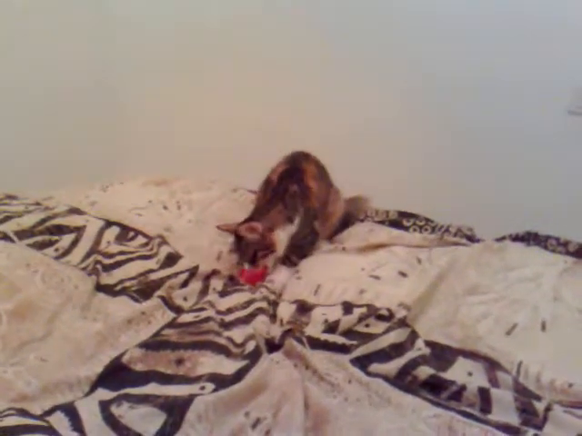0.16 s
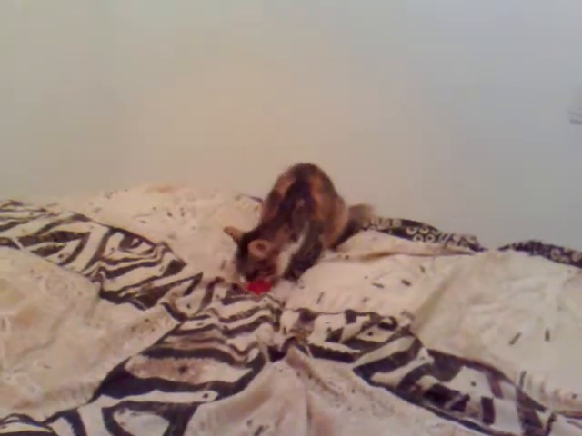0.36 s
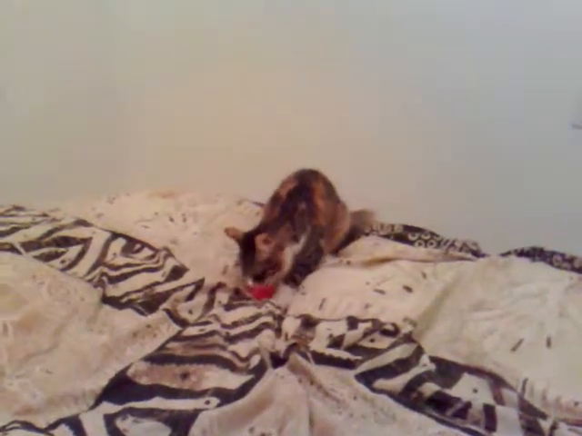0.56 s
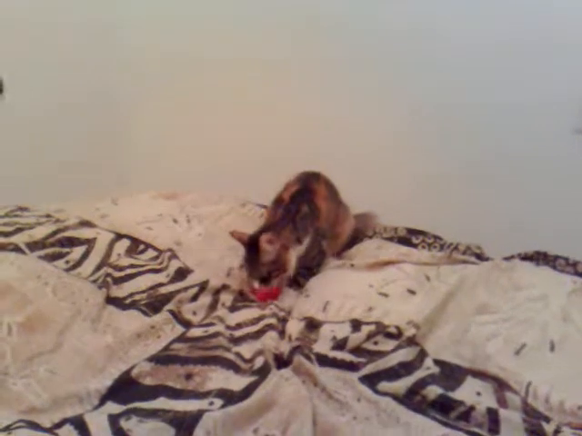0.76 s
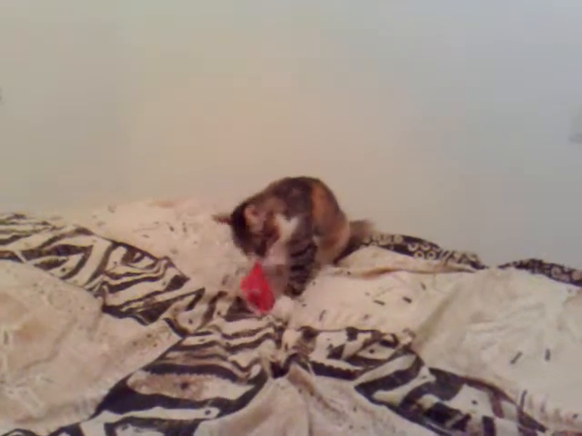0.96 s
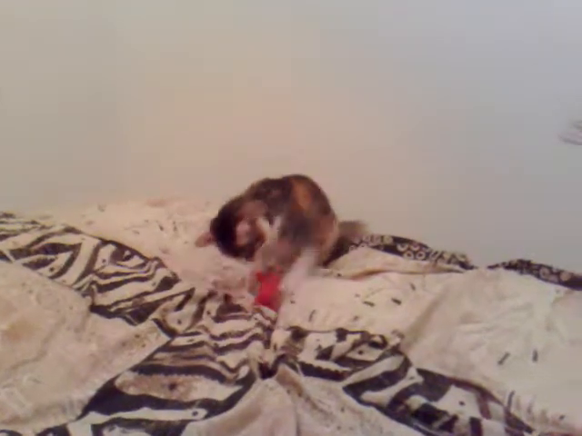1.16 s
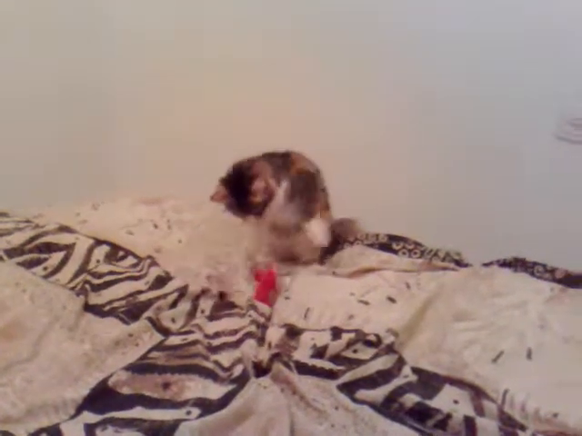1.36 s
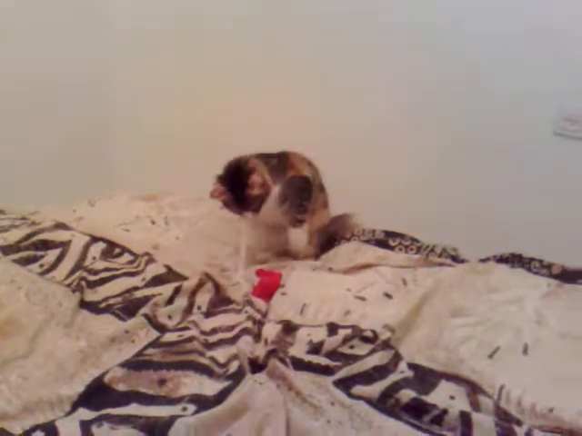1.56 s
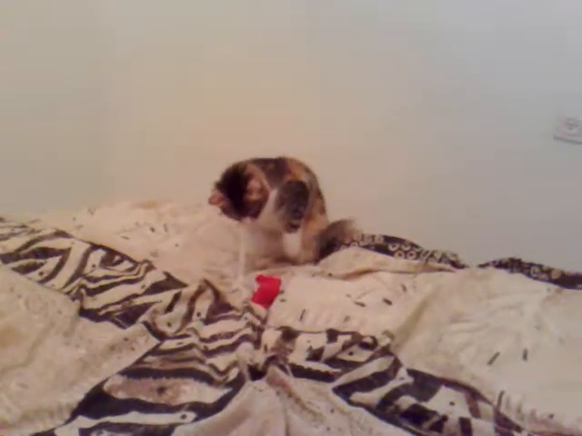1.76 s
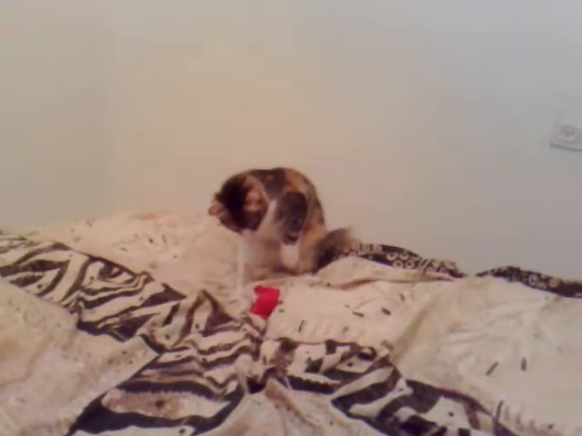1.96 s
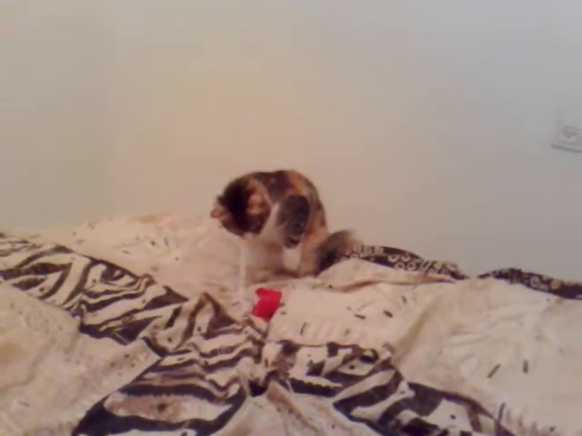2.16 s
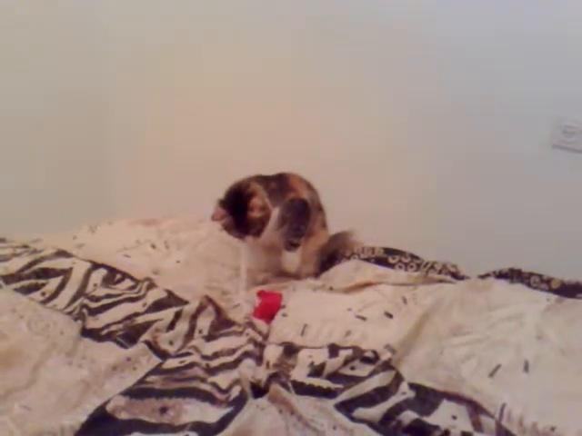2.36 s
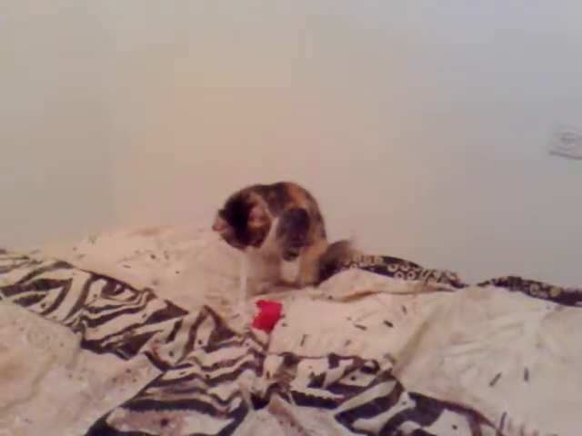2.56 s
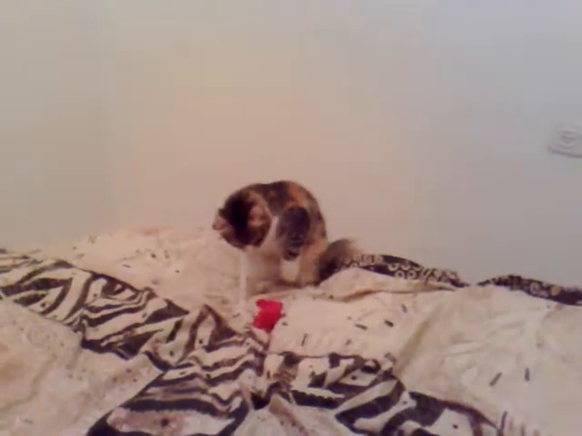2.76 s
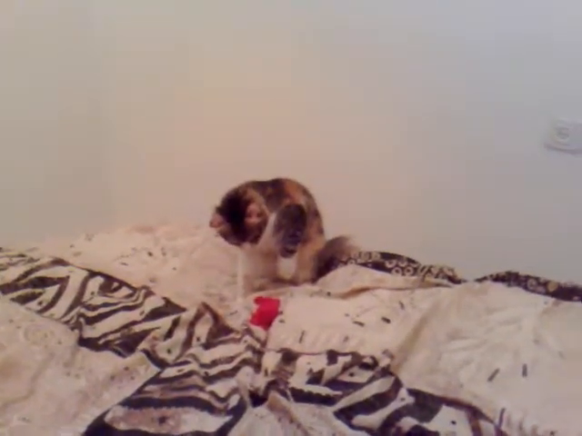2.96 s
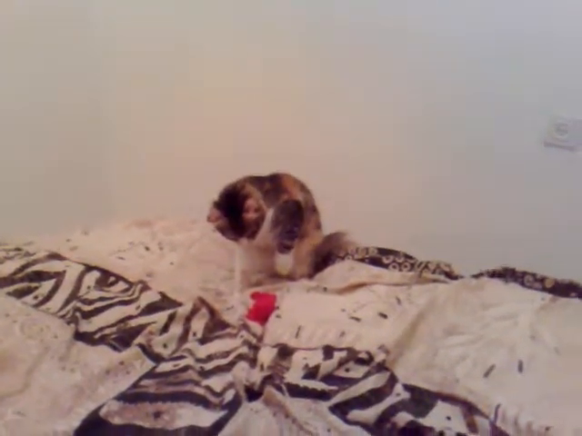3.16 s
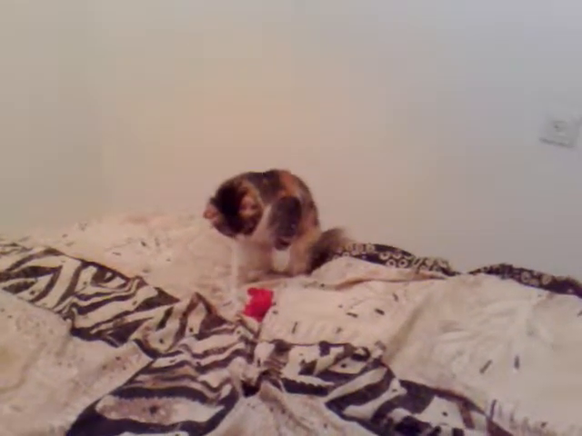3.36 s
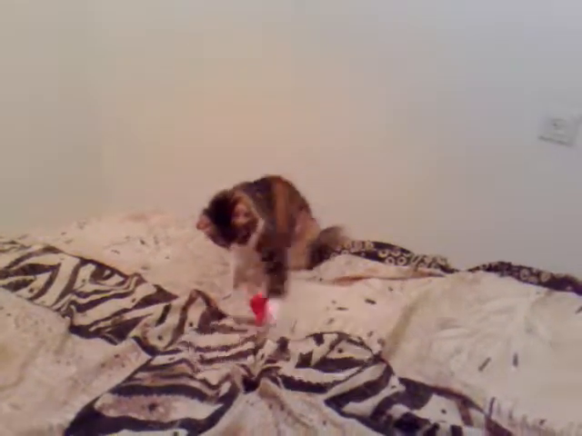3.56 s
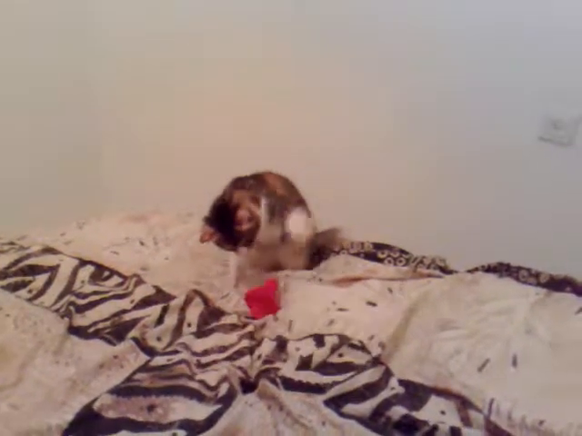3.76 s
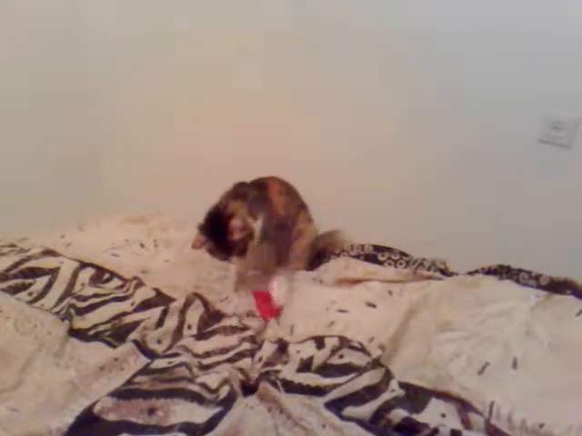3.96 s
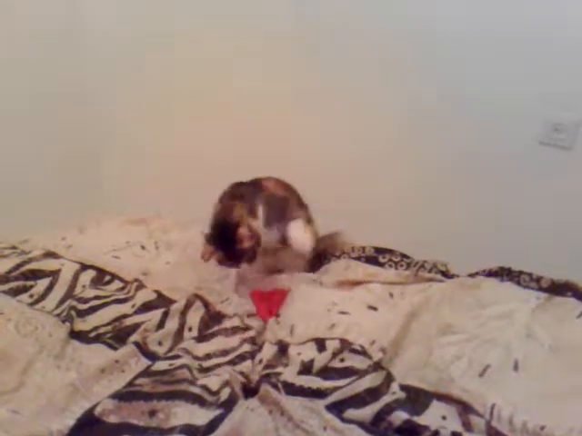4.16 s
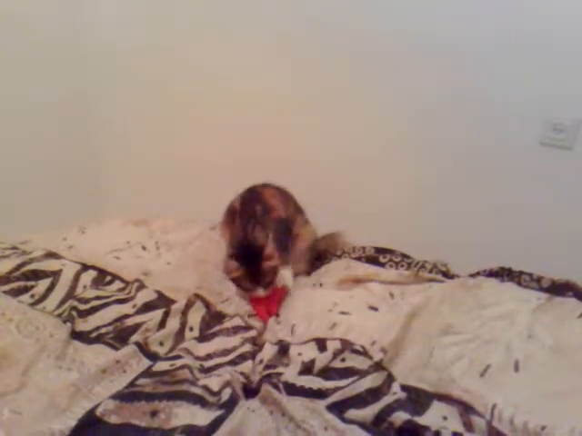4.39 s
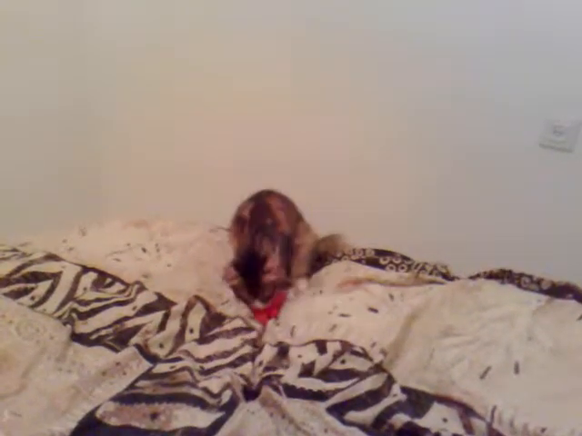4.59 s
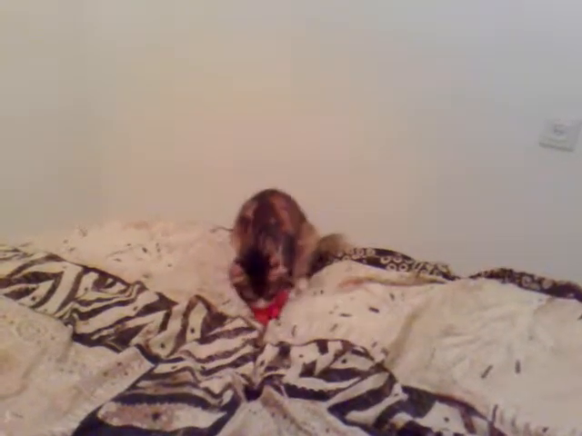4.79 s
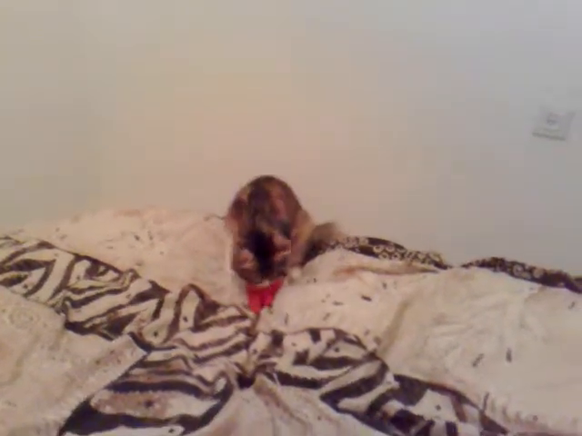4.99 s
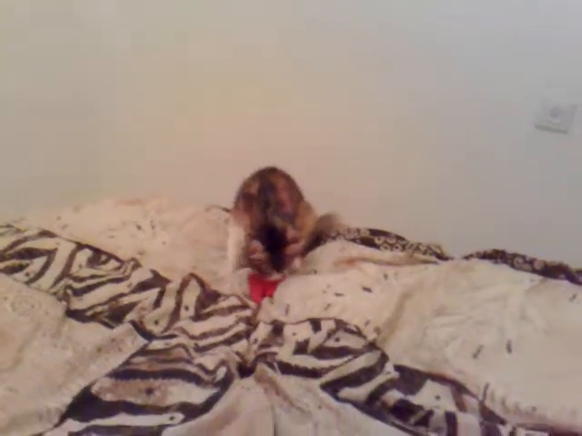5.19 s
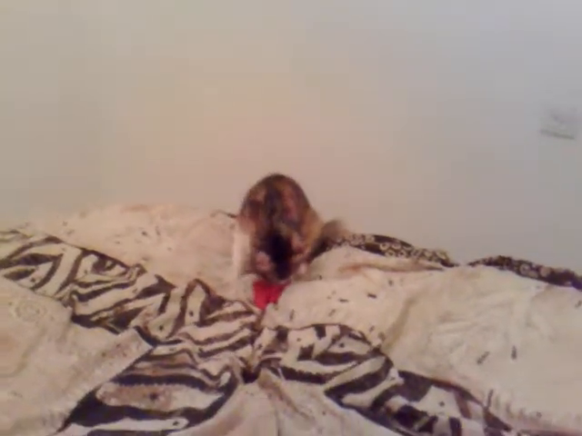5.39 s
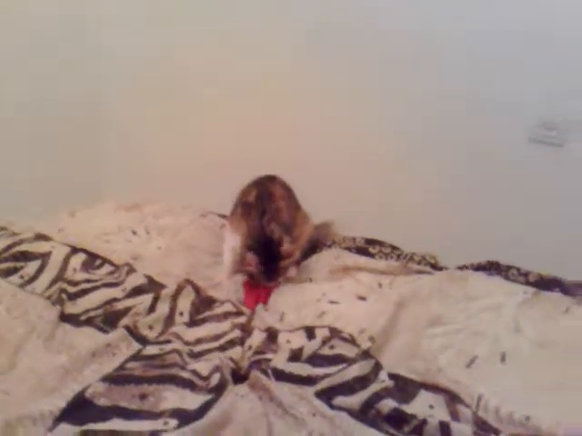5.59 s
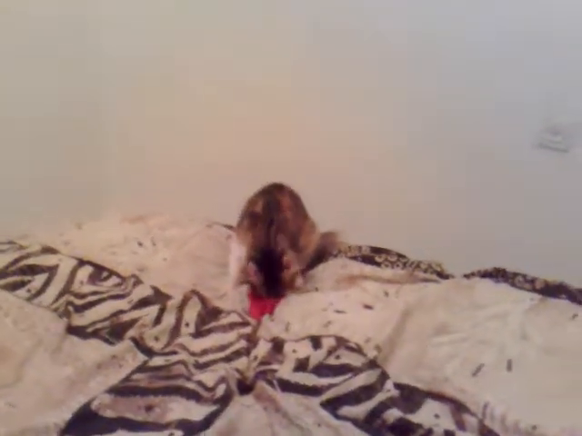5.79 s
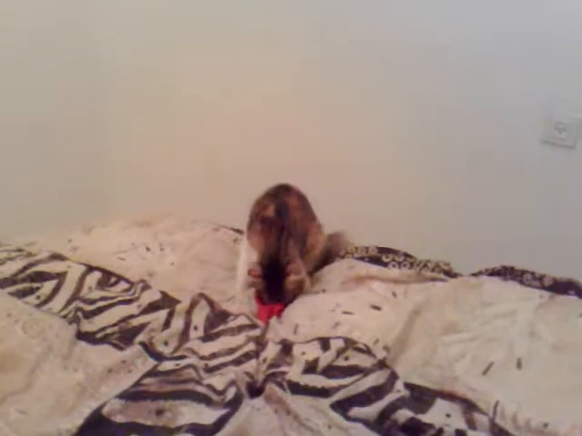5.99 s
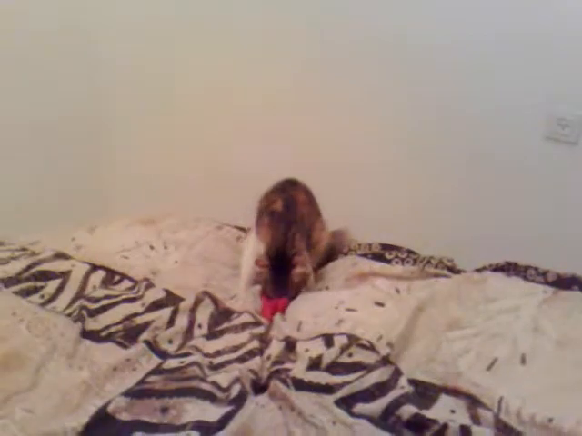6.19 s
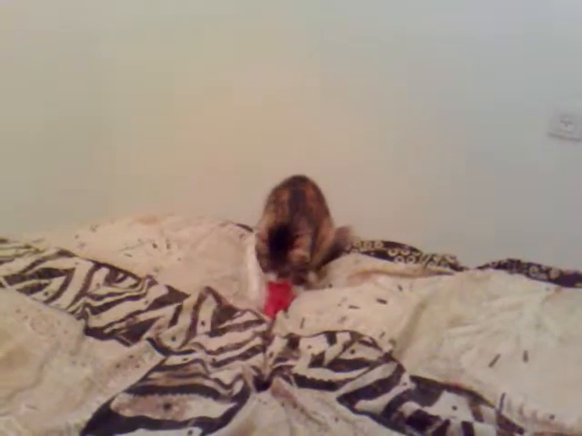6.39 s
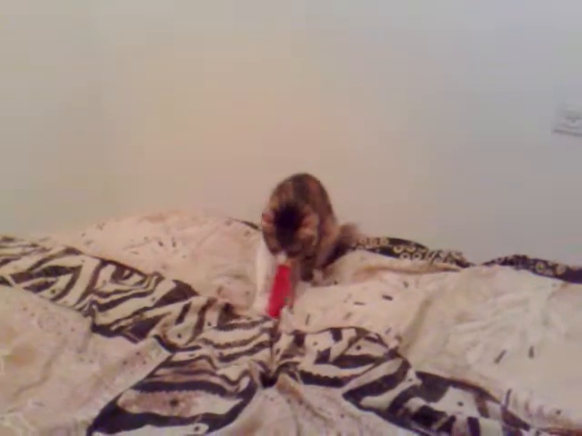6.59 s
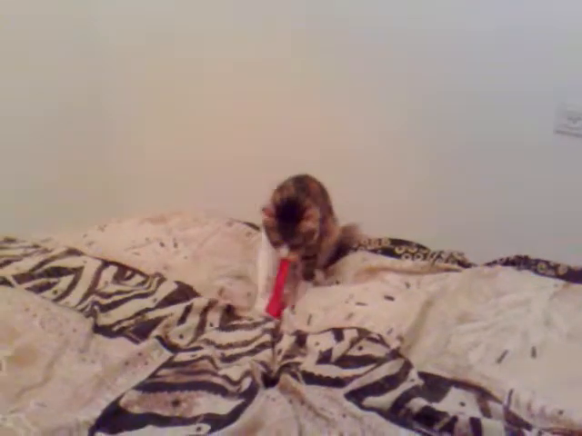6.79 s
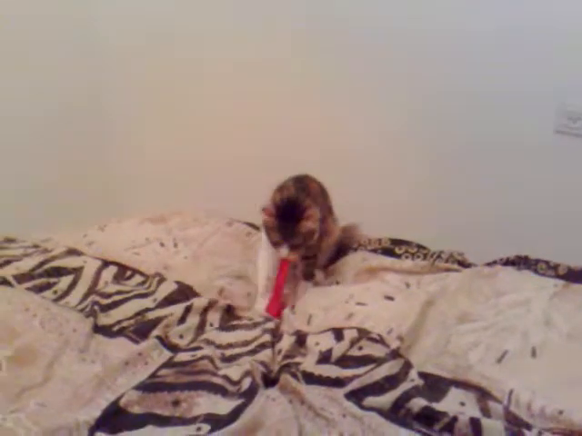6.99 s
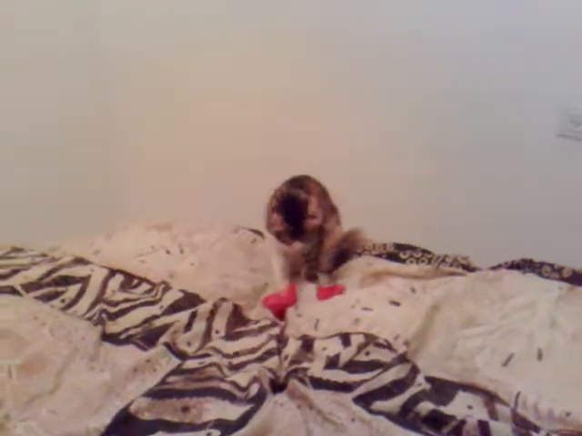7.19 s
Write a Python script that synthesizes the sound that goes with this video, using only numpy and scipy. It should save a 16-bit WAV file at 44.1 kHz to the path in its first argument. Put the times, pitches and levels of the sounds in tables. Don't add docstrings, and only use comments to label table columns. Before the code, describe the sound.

In a small bare bedroom, a cat paws a limp balloon on a bed a few metres away. Faint fur and claw rustles lead to a soft rubber snap and a much louder one, ringing briefly in the room. After quiet, dull paw pats land on the quilt. Later, tiny ticks right at the microphone grow into hard dry clicks with low bumps, over rumble, hiss and a thin whine.

```python
import sys
import numpy as np
from scipy import signal
from scipy.fft import rfft, irfft
from scipy.io import wavfile

SR = 44100
rng = np.random.default_rng(int(sys.argv[2]) if len(sys.argv) > 2 else 0)


def dump(signal):
    limited = np.clip(np.atleast_2d(signal).T, -1, 1)
    pcm = np.round(limited * 32767).astype(np.int16)
    wavfile.write(sys.argv[1], SR, pcm)


def boost_factor(decibels):
    exponent = np.asarray(decibels, float) / 20
    return 10 ** exponent


N = 319504


def rms_one(x):
    return x / np.sqrt(np.mean(x ** 2) + 1e-20)


def peak_at(sound, db):
    return sound * boost_factor(db) / np.abs(sound).max()


def at_hz(points, hz):
    table_hz, value = np.transpose(points)
    return np.interp(np.log(np.maximum(hz, 1)), np.log(table_hz), value)


def add(track, s, sound):
    i = round(s * SR)
    track[i:i + len(sound)] += sound[:N - i]


def resonance(x, hz, width_hz):
    r = np.exp(-np.pi * width_hz / SR)
    edge = (1 - r * r) / 2
    return signal.lfilter([edge, 0, -edge], [1, -2 * r * np.cos(2 * np.pi * hz / SR), r * r], x)


def band(x, low_hz, high_hz):
    sos = signal.butter(2, [low_hz, min(high_hz, SR / 2.2)], "band", fs=SR, output="sos")
    return signal.sosfilt(sos, x)


# (pitch [Hz], level per Hz [dB])
HISS_COLOUR = [(12, -37), (20, -11), (26, -7), (65, 0), (355, -10), (586, -15), (866, -19.5), (1560, -23.5),
               (2300, -25.5), (6840, -30), (11000, -29.5), (13200, -27), (15650, -25), (16050, -51.5)]


def floor(hiss_db=-62, whine_hz=12520, whine_width_hz=140, whine_db=-77.5):
    colour = boost_factor(at_hz(HISS_COLOUR, np.fft.rfftfreq(N, 1 / SR)))
    hiss = irfft(rfft(rng.standard_normal(N)) * colour, N)
    whine = resonance(rng.standard_normal(N), whine_hz, whine_width_hz)
    return boost_factor(hiss_db) * rms_one(hiss) + boost_factor(whine_db) * rms_one(whine)


# (pitch [Hz], time to die by 60 dB [s])
ROOM_RING = [(100, 0.49), (260, 0.42), (700, 0.36), (1400, 0.39), (2300, 0.44), (3100, .36), (4250, 0.37),
             (5200, 0.34), (7000, 0.23), (12800, 0.19)]


def bedroom(gap_ms=1.2, build_ms=0.54):
    t = np.arange(SR * 3 // 4) / SR
    edges = 40 * 2 ** np.arange(0, 9.1, .25)
    white = rng.standard_normal((2, len(t)))
    tail = np.zeros(len(t))
    for k, (low, high) in enumerate(zip(edges, edges[1:])):
        t60 = at_hz(ROOM_RING, np.sqrt(low * high))
        tail += band(white[k % 2], low, high) * boost_factor(-60 * t / t60)
    return tail * (1 - np.exp(-np.maximum(1000 * t - gap_ms, 0) / build_ms))


# (time when fullest [s], swell [s], fade [s], level [dB], brightness [dB])
CLOTH_STROKES = [(.25, .06, 0.08, -74, -14), (.47, .1, 0.28, -77.5, -14), (.78, .06, .1, -82, -10),
                 (1.08, .12, .05, -75, -10), (1.72, 0.13, 0.17, -73, -8), (1.87, .03, 0.053, -84, -3),
                 (4.72, 0.095, 0.07, -70.5, -15), (5.695, .03, 0.012, -71, -5),
                 (5.759, 0.032, 0.076, -65.5, 3.5), (6.625, .01, 0.024, -69, -8),
                 (6.695, 0.034, 0.11, -61, -16), (6.79, 0.027, 0.056, -64.5, -8),
                 (6.875, .02, 0.034, -73, -4)]


def rustle(room, edge_db=-15.5):
    catches = rng.random(N) < 9000.0 / SR
    grains = catches * boost_factor(2.0 * rng.exponential(1, N)) * rng.choice([-1, 1], N)
    dull = rms_one(band(grains, 450, 3000))
    bright = rms_one(band(grains, 2200, 7500))
    t, out = np.arange(N) / SR, np.zeros(N)
    for s, swell_s, fade_s, db, bright_db in CLOTH_STROKES:
        away = np.maximum((s - t) / max(swell_s, .002), (t - s) / max(fade_s, .002))
        out += boost_factor(db + edge_db * away) * (dull + boost_factor(bright_db) * bright)
    return boost_factor(4.0) * out + boost_factor(-35.5) * signal.fftconvolve(out, room)[:N]


def causal_colour(spectrum, size=4096):
    hz = np.arange(size // 2 + 1) * SR / size
    cepstrum = irfft(np.log(boost_factor(at_hz(spectrum, hz))))
    cepstrum[1:size // 2] *= 2
    cepstrum[size // 2 + 1:] = 0
    return irfft(np.exp(rfft(cepstrum)))


def burst(spread_ms, size=2048):
    hz = np.arange(size // 2 + 1) * SR / size
    spread_s = np.clip(spread_ms, .05, 15) / 1000
    scatter = np.interp(hz * spread_s, np.arange(400), rng.random(400) ** 2)
    bending_s = .0011 * np.sqrt(1000 / (hz + 300.0)) - .0002
    delay_s = 1.6 * spread_s * scatter + bending_s
    phase = 2 * np.pi * np.cumsum(delay_s) * hz[1]
    return irfft(np.exp(-1j * phase))[:size // 2]


def far_blows(events, colours, room):
    out = np.zeros(N)
    for (s, db, spread_ms, tail_db), colour in zip(events, colours):
        blow = peak_at(signal.fftconvolve(burst(spread_ms), causal_colour(colour)), db)
        add(out, s, blow)
        add(out, s, boost_factor(tail_db) * signal.fftconvolve(blow, room))
    return out


# (time [s], peak level [dB], spread [ms], echo tail level [dB])
RUBBER_SNAPS = [
    (1.1417, -24, 0.72, -24.5),
    (1.3126, -8, .7, -22.5),
    (6.9362, -21.5, 2.5, -22),
    (6.9524, -24, 0.83, -24.5),
]
# (pitch [Hz], level per Hz [dB])
RUBBER_COLOURS = [
    [(35, -41.5), (60, -3), (301, -6), (363, -4.5), (540, -15.5), (732, -3.5), (924, -16), (1380, -2),
     (1660, -7.5), (2090, -10), (3040, -10), (5720, -12.5), (16000, -20.5)],
    [(40, -18), (90, -1), (290, -15.5), (450, -8), (1000, -11.5), (1300, -6.5), (2400, -4), (3050, -10),
     (4250, 0), (5050, -9), (5800, -2), (7400, -12), (9400, -3), (12000, -10.5), (15800, -9.5),
     (17000, -43)],
    [(35, -45), (60, 0), (330, -6), (1660, -4.5), (2250, -4), (2900, -8), (8710, -8.5), (12100, -12.5),
     (16000, -23)],
    [(35, -36), (60, 10), (408, -3), (785, -12.5), (1950, 4), (2650, -6), (6740, 0), (7750, -6),
     (14600, 3.5), (16000, -38.5)],
]


def snaps(room):
    return far_blows(RUBBER_SNAPS, RUBBER_COLOURS, room)


# (time [s], peak level [dB], spread [ms], echo tail level [dB])
PAW_SWATS = [
    (3.7625, -43, 5.6, -19),
    (3.772, -36.5, 6.8, -25),
    (3.781, -35, 9.0, -26),
    (4.1575, -38, 6.8, -25.5),
]
# (pitch [Hz], level per Hz [dB])
PAW_COLOURS = [
    [(300, -20), (600, -19), (930, 0), (1400, -21), (2500, -26), (6000, -43), (12000, -65)],
    [(180, -26), (300, -13.5), (1050, -4), (2300, -10), (3710, -12), (5130, -23), (5720, -23), (8410, -34),
     (12000, -33), (15600, -61), (22000, -120)],
    [(29, -41), (50, 1), (128, 8), (279, -7), (432, 0), (531, -14), (595, -4.5), (1110, -12.5), (1180, -7),
     (2250, -10), (12000, -71), (15600, -71), (22000, -120)],
    [(29, -33), (50, -6), (172, 0), (273, -17), (368, -1), (623, -11.5), (1360, -12.5), (2470, -22.5),
     (3100, -20.5), (8130, -39), (12000, -43), (15600, -67), (22000, -120)],
]


def swats(room):
    quilted_room = room * boost_factor(-25.0 * np.arange(len(room)) / SR)
    return far_blows(PAW_SWATS, PAW_COLOURS, quilted_room)


def casing(fade_ms=1.25, level_db=-19.0, size=400):
    echoes = boost_factor(level_db) * rng.standard_normal(size) * np.exp(-np.arange(size) * 1000 / SR / fade_ms)
    echoes[:8] = 0
    echoes[0] = 1
    return echoes


# (time [s], peak level [dB], ring pitch [Hz], hollow ring level [dB])
CLOSE_TICKS = [(5.0727, -51, 4000, -5), (5.129, -54, 5420, -7), (5.1414, -58, 3420, 0),
               (5.277, -47.5, 2550, -1.5), (5.3275, -48.5, 3350, -18), (5.448, -60, 3700, 9),
               (5.5848, -52.5, 5000, -2), (5.713, -36, 2620, -5), (5.739, -33.5, 2760, -2),
               (5.75, -49, 4610, 6), (6.133, -30, 4350, -8), (6.216, -57.5, 4300, 10.5),
               (6.6908, -63, 2940, 0), (6.744, -32.5, 5400, -11), (6.7767, -29, 3900, -22),
               (6.9003, -41, 6370, -4), (6.9998, -29, 2620, -7), (7.0341, -26, 6500, -19)]


def ticks(hollow_hz=1200, hollow_width_hz=610):
    out = np.zeros(N)
    for s, db, hz, hollow_db in CLOSE_TICKS:
        slip = signal.fftconvolve(burst(.3), casing())
        bright = band(band(slip, 0.48 * hz, 1.26 * hz), .5 * hz, 2.3 * hz)
        hollow = band(resonance(slip, hollow_hz, hollow_width_hz), 460, 2200)
        add(out, s - .0004, peak_at(bright, db))
        add(out, s, peak_at(hollow, db + hollow_db))
    return out


# (time [s], peak level [dB], pitch [Hz])
MIC_JOLTS = [(5.735, -43.5, 78), (5.6924, -52.5, 300.0), (5.714, -53, 754), (5.74, -36, 460),
             (5.749, -40.5, 800.0), (6.135, -37, 340), (6.669, -52, 420), (6.6899, -45, 516),
             (6.695, -48, 338), (6.714, -51, 330), (6.7245, -48, 480), (6.744, -40, 258),
             (6.754, -43, 80.0), (6.764, -44, 300), (6.7575, -30, 486), (6.87, -48.5, 198),
             (6.9034, -34.5, 240), (6.906, -30.5, 333), (6.908, -41, 79.6), (6.936, -61, 75.7),
             (6.95, -49, 70.0), (7, -42.5, 300.0), (7.021, -51.5, 75.6), (7.037, -55, 73.8)]


def jolts():
    out = np.zeros(N)
    for s, db, hz in MIC_JOLTS:
        cycles = np.arange(3000) / SR * hz
        add(out, s, peak_at(np.sin(2 * np.pi * cycles) * cycles * np.exp(-2.3 * cycles), db))
    return out


# (pitch [Hz], level per Hz [dB])
CRACK_COLOUR = [(290, -29.5), (500, -4.5), (1000, -11.5), (2500, -1), (9500, -3), (13000, -6.5),
                (15000, -7.5), (16700, -14)]


def click_colour(main_hz, side_hz, side_db, shell_db, crack_db, treble_db):
    hz = np.geomspace(200, 20000, num=300)
    # (pitch [Hz], level [dB], sharpness: pitch over width)
    rings = [(main_hz, 0, 5.5), (side_hz, side_db, 5.5), (1295, shell_db, 7.3)]
    gain = sum(boost_factor(db) / (1 + (sharp * (hz / top_hz - top_hz / hz)) ** 2) for top_hz, db, sharp in rings)
    treble = at_hz([(4600, 0), (11000, treble_db)], hz)
    crack = crack_db + at_hz(CRACK_COLOUR, hz) + treble
    return np.transpose([hz, 20 * np.log10(gain + boost_factor(crack))])


# (time [s], peak level [dB], spread [ms], treble of the crack [dB])
CLOSE_CLICKS = [
    (6.1345, -13, .45, -10.5),
    (6.6076, -22.5, 0.54, -9),
    (6.7553, -6, 0.49, -1.5),
    (6.9014, -8.5, 1.0, 5),
    (6.9071, -2, .6, -5),
    (7.1914, -5.5, .4, 13),
]
# (main ring [Hz], side ring [Hz], side ring level [dB],
# hollow shell level [dB], broad crack level [dB])
RINGING_PARTS = [
    (7450, 3150, -24, -16, -16),
    (4570, 3620, -0.5, -0.5, -11),
    (6670, 10000, -9, 22, -5),
    (5100, 8200, -8, 0, -2),
    (3900, 6300, -9, -4, -2.5),
    (6540, 4320, -9, -26, -25.5),
]


def clicks():
    out = np.zeros(N)
    damping = boost_factor(-1.8 * np.arange(2000) * 1000 / SR)
    for (s, db, spread_ms, treble_db), rings in zip(CLOSE_CLICKS, RINGING_PARTS):
        colour = causal_colour(click_colour(*rings, treble_db))
        ring = signal.fftconvolve(burst(spread_ms), colour)[:2000]
        add(out, s, peak_at(signal.fftconvolve(ring * damping, casing()), db))
    return out


def afterring(close, level_db=-44, fade_ms=5.2):
    fade = np.exp(-np.arange(2400) * 1000 / SR / fade_ms)
    murmur = band(rng.standard_normal(2400), 500, 5000) * fade
    return boost_factor(level_db) * signal.fftconvolve(close, murmur)[:N]


def scene():
    room = bedroom()
    far = rustle(room) + snaps(room) + swats(room)
    close = ticks() + jolts() + clicks()
    return (floor() + far + close + afterring(close))[None, :]


def low_pass(x):
    return signal.sosfilt(signal.butter(12, 16990, fs=SR, output="sos"), x)


def record(dry):
    mix = signal.sosfilt(signal.cheby2(10, 60, 17200, fs=SR, output="sos"), dry)
    return low_pass(mix)


dry = scene()
out = record(dry)
dump(out)
```